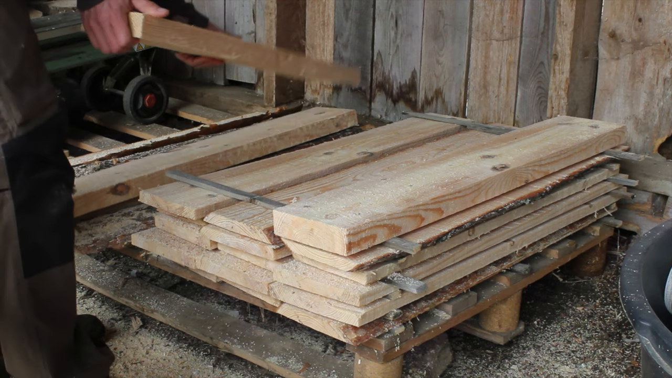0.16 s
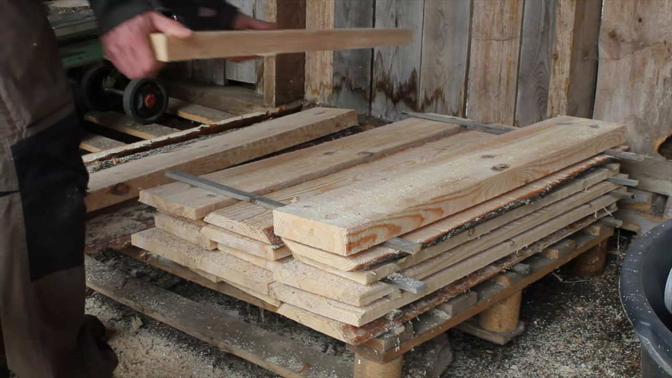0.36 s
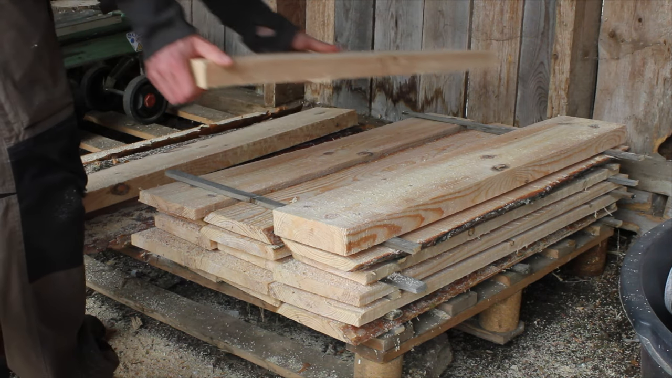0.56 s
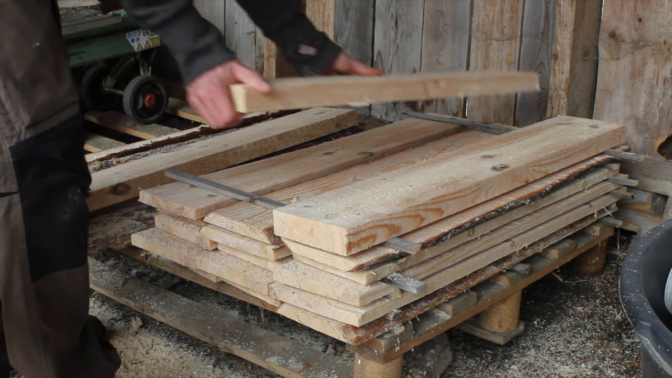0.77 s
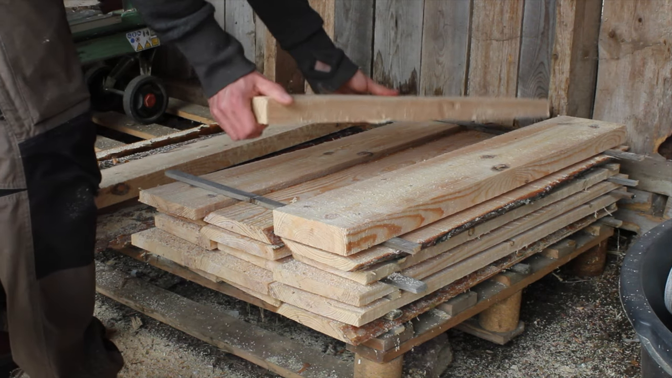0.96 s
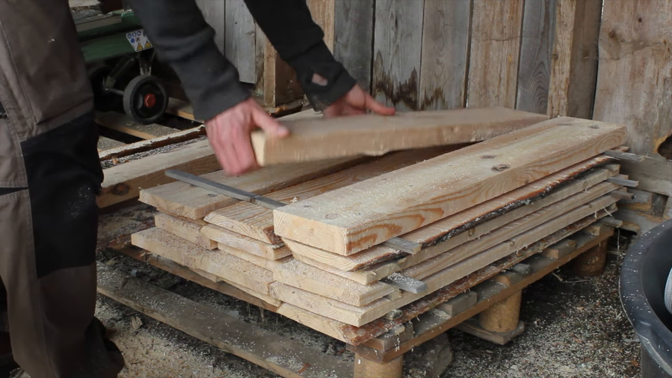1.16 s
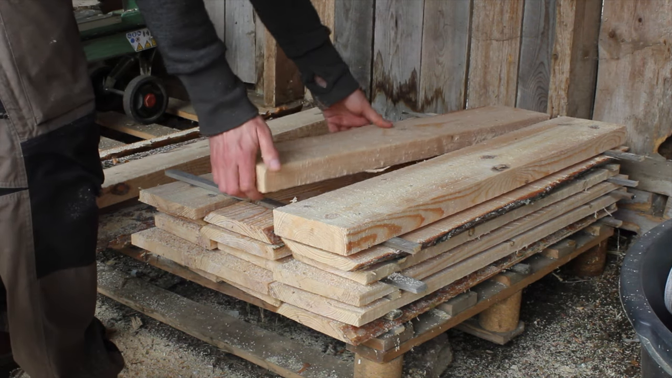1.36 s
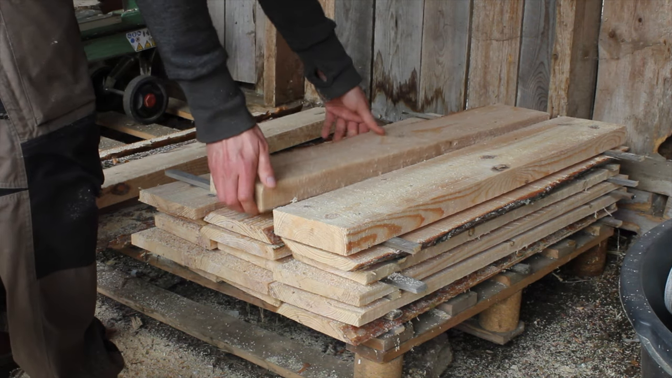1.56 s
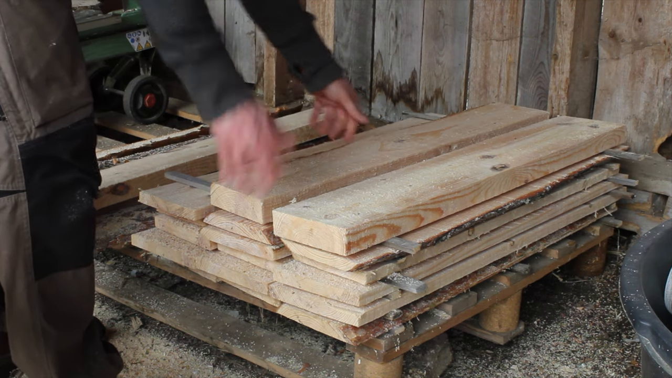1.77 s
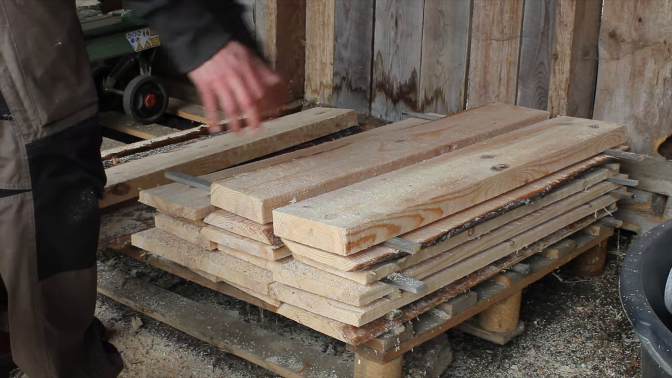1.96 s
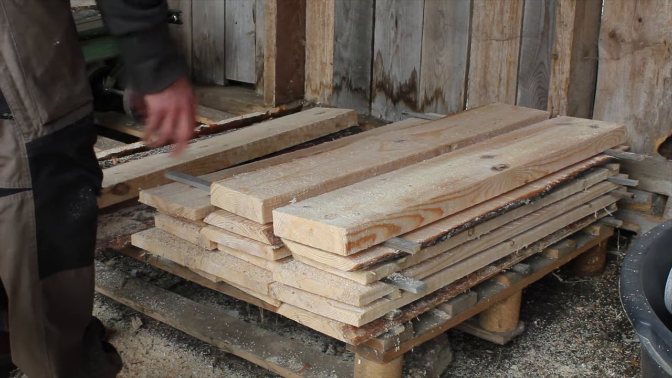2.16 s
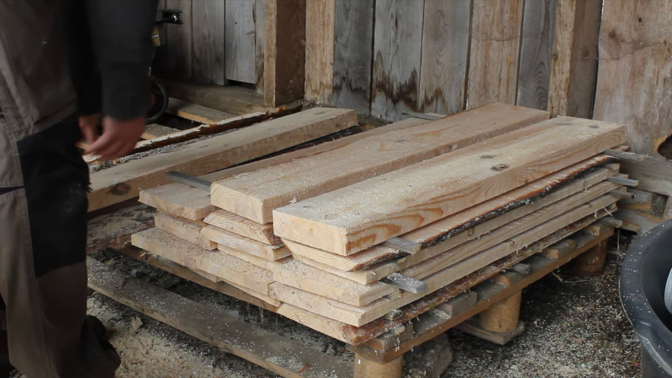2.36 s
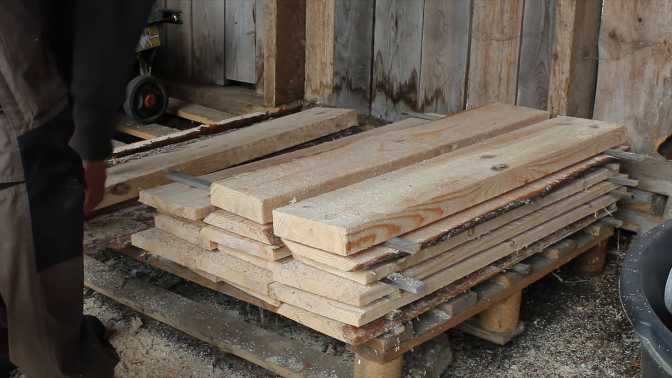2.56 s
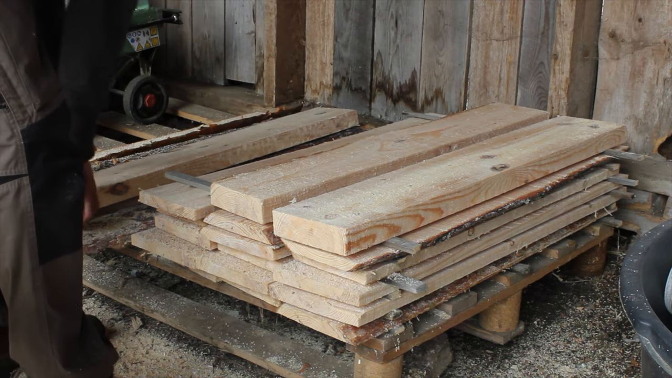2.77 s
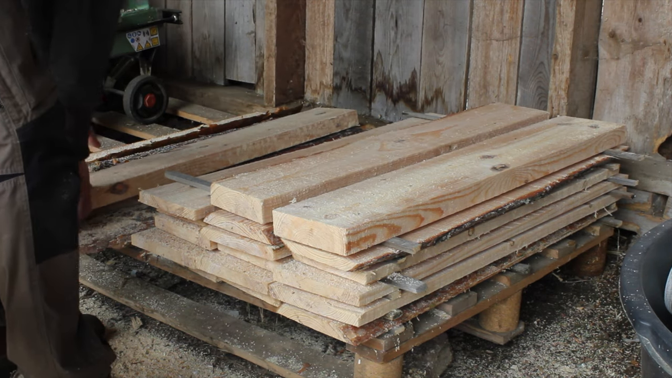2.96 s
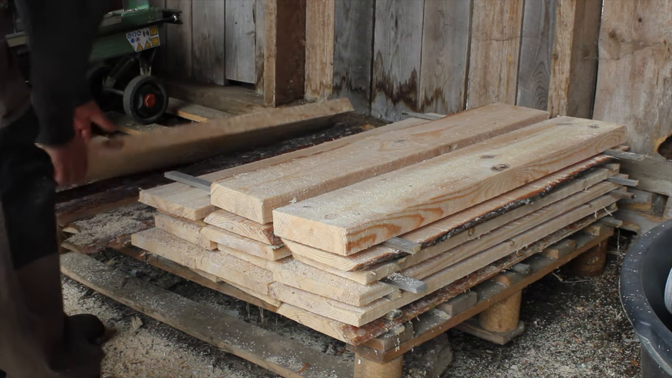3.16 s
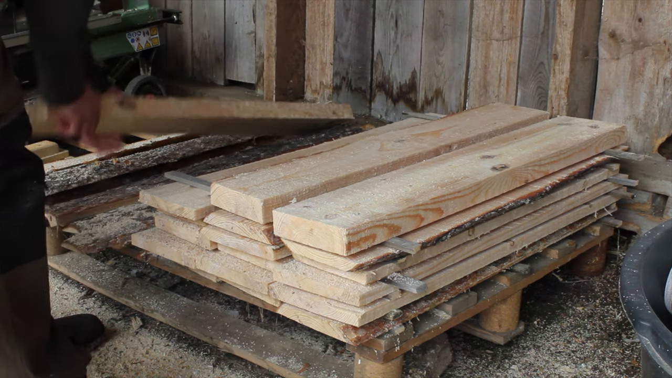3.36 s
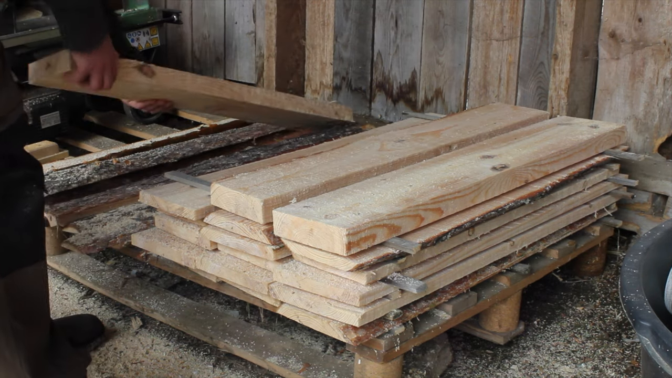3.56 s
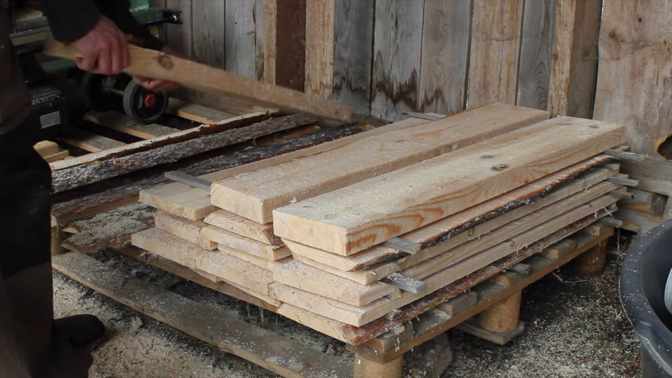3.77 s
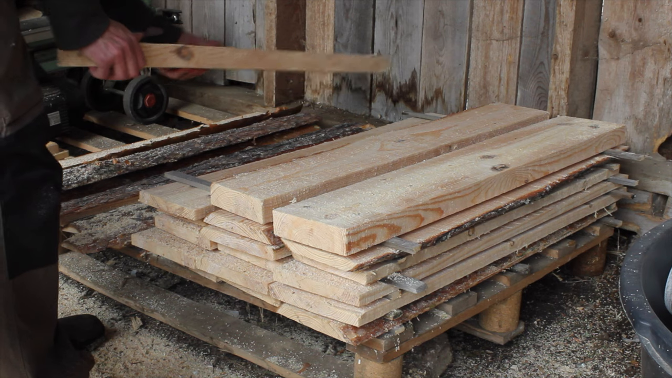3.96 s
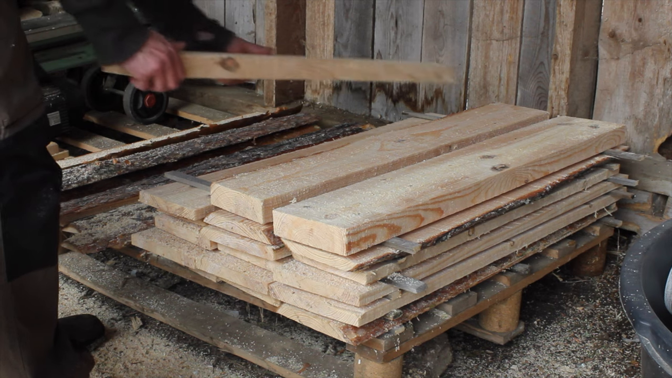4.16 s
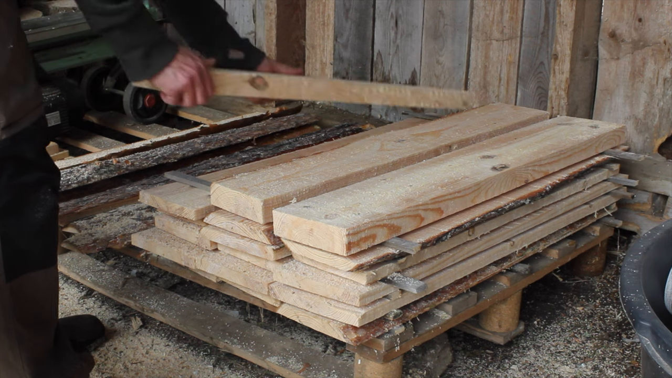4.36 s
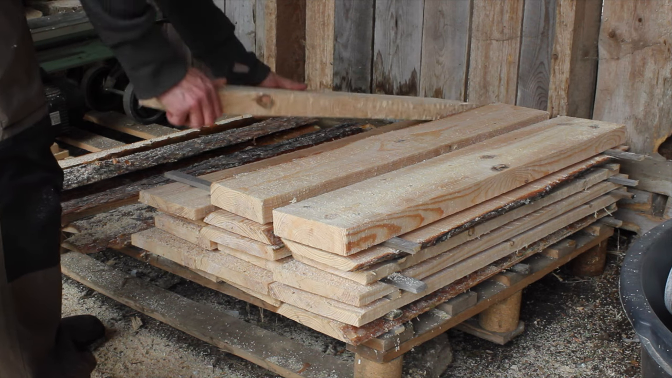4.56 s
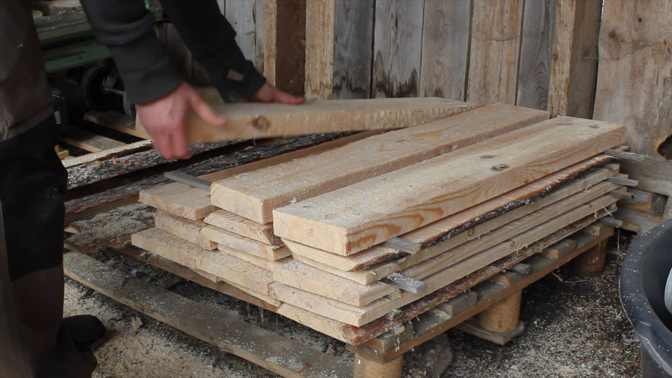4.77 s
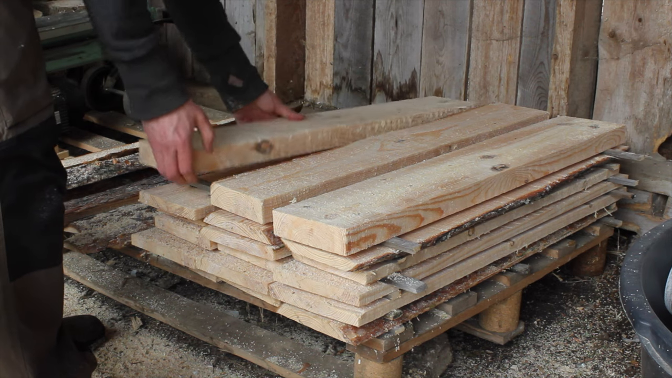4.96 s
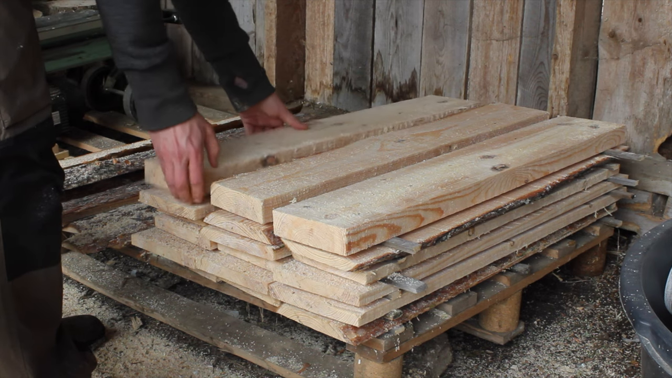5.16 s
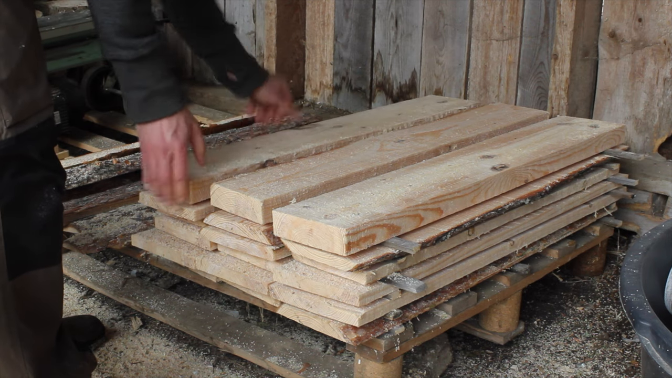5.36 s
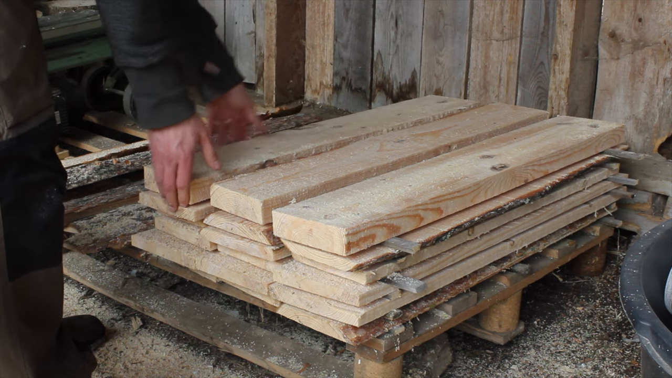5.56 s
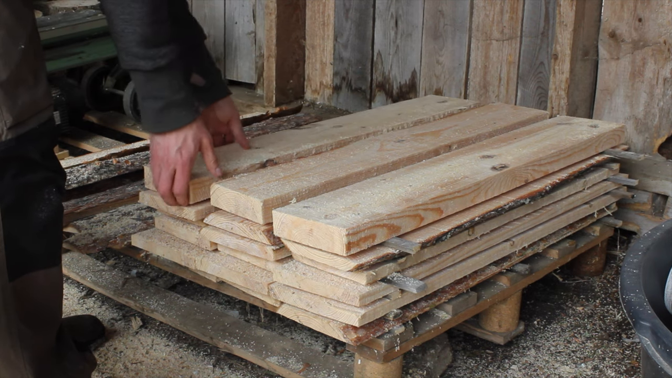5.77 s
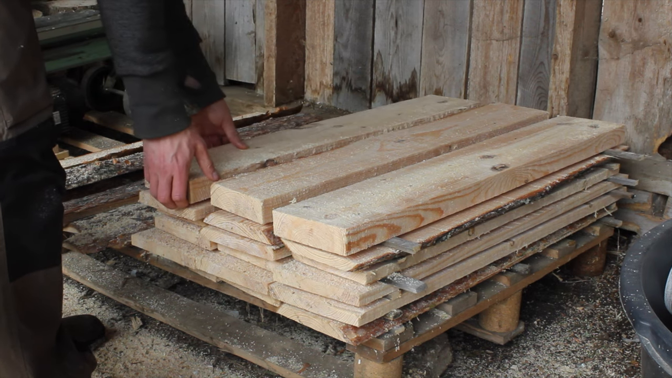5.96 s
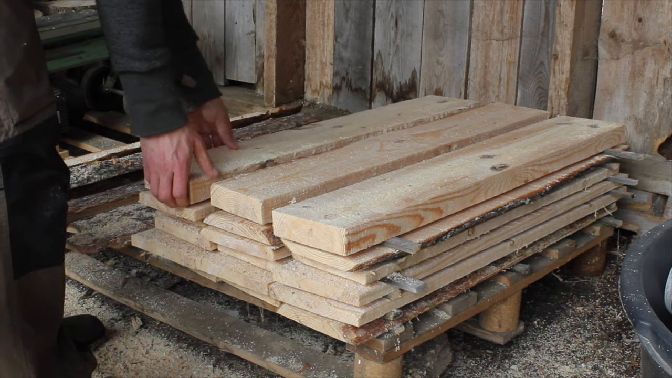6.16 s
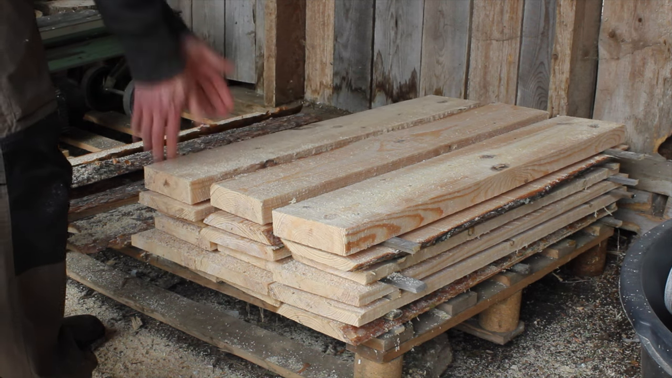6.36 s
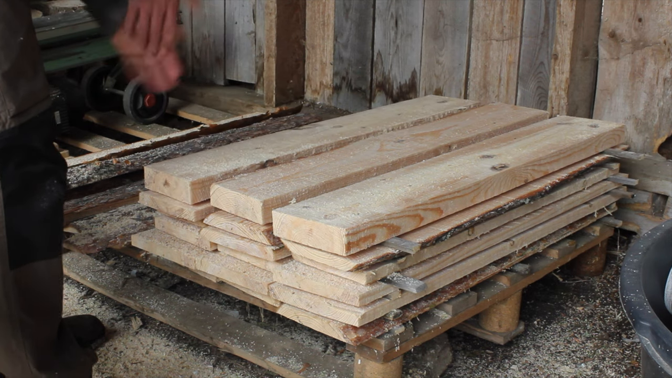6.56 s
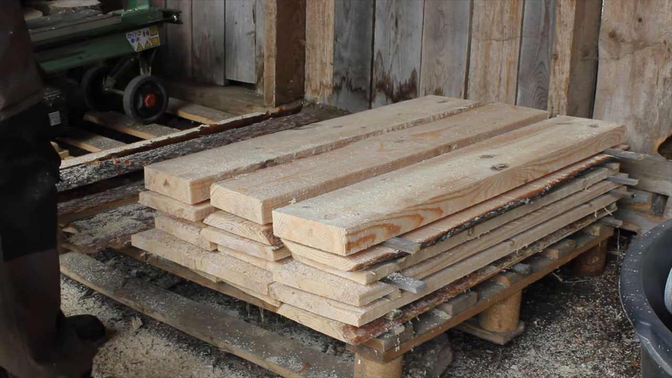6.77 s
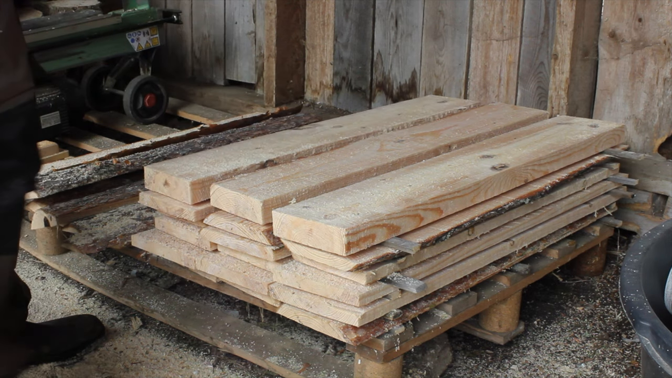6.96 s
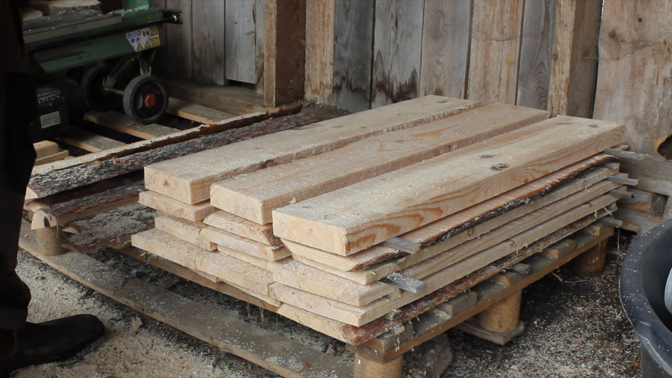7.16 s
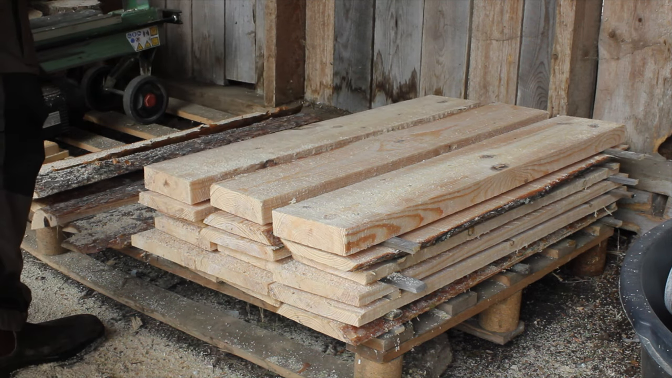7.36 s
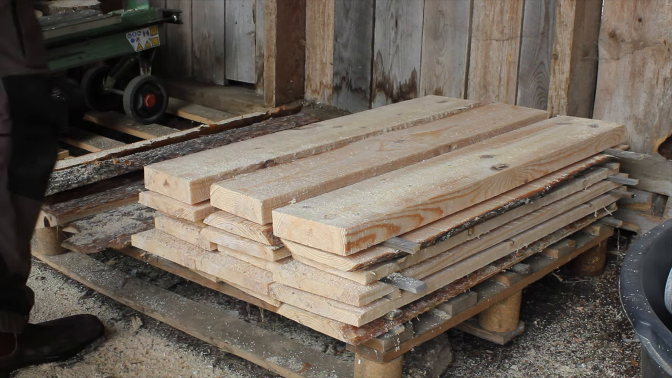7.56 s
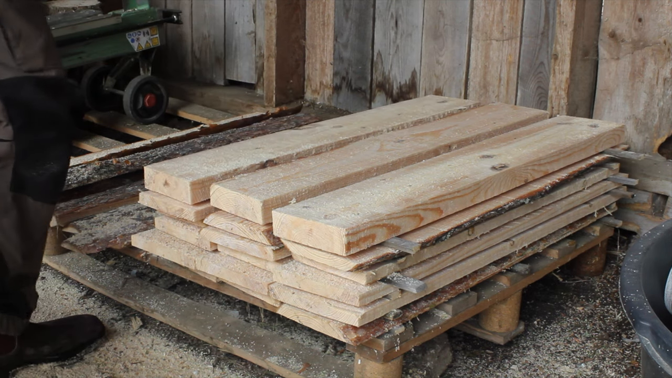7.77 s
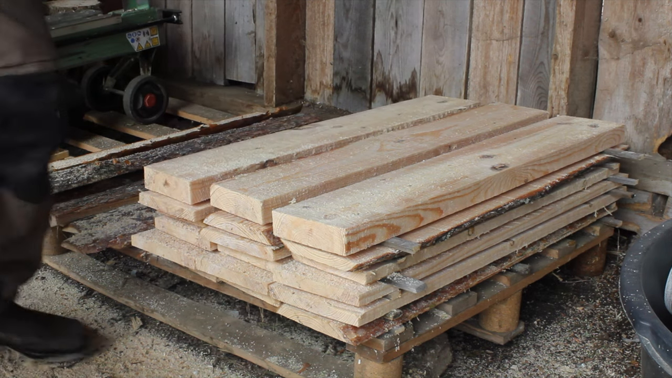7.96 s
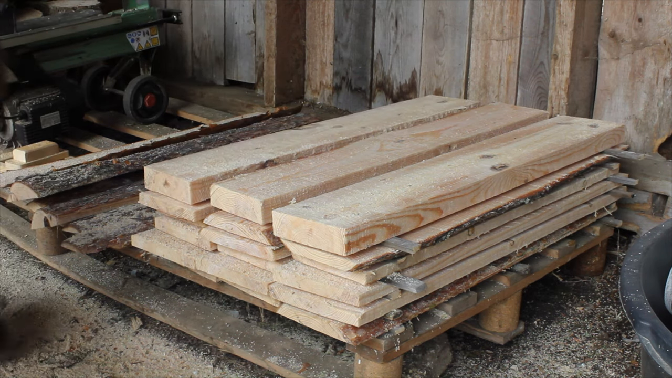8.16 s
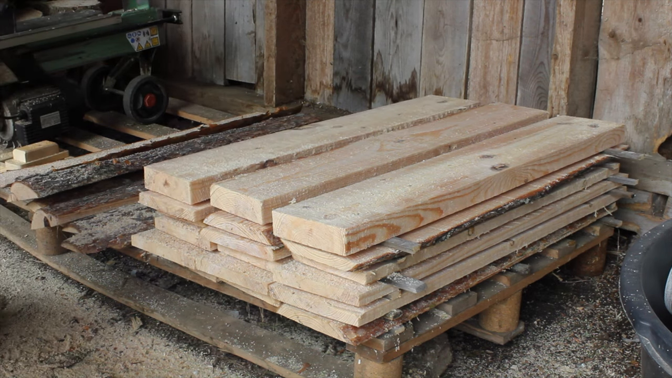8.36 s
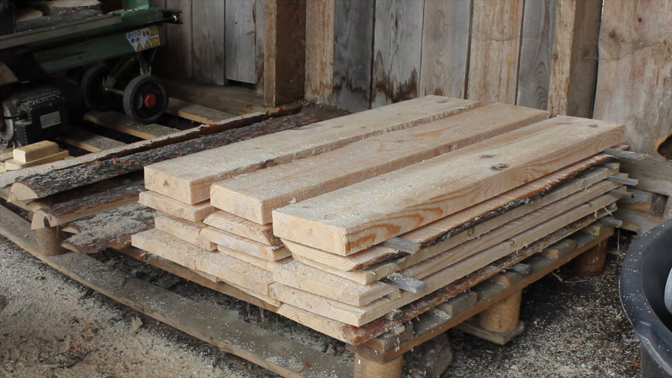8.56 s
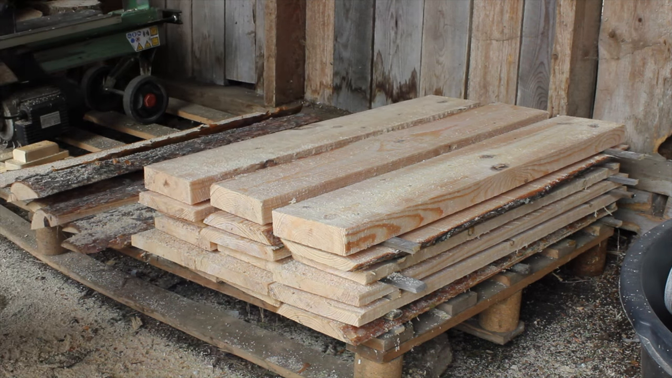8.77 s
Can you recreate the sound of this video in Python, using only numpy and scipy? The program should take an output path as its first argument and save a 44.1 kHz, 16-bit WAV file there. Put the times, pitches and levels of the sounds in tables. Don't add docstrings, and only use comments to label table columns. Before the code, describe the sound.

Near microphone, dry sound with a very short wooden-wall echo. Rough planks scrape, snap splinters and knock down onto a hollow pile twice, the second time harder. Small adjusting ticks follow, then hands are dusted off with a light sliding brush and two bright, crisp slaps, the loudest sounds. Soft steps and cloth rustle end it over low traffic hum and steady hiss.

```python
import sys
import numpy as np
from scipy import signal
from scipy.fft import rfft, irfft, next_fast_len
from scipy.io import wavfile
from scipy.ndimage import map_coordinates

SR = 44100
rng = np.random.default_rng(int(sys.argv[2]) if len(sys.argv) > 2 else 0)


def dump_mix(stems):
    frames = np.atleast_2d(stems).T
    limited = np.clip(frames, -1, 1)
    pcm = np.round(limited * 32767).astype(np.int16)
    wavfile.write(sys.argv[1], SR, pcm)


def makeup_ratio(level_db):
    decades = np.asarray(level_db, float) / 20
    return 10 ** decades


N = 388956

# [f/Hz, level/dB]
FAR_SPECTRUM = [(12, -35), (20, -9.5), (70, -8), (110, -12), (260, -4), (480, -2), (950, 1), (1150, -1.5),
                (1400, -10), (1900, -15), (4000, -15.5), (8000, -18.5), (12000, -21), (15600, -26.5)]
FAR_DB = -55.5
# [t/s, level/dB, rise/s, fall/s]
BACKGROUND_SWELLS = [(3.24, -56, 0.56, 1.5), (5.212, -54, 0.93, 0.33), (6.9, -54.5, 1.5, 0.45),
                     (7.69, -60.5, 1.2, 1.2), (8.81, -54, 0.64, .7)]

# [t/s, peak/dB, t60/s, f/Hz]
PUSHES = [(0.005, -45.5, 0.37, 190), (.045, -45, 0.2, 200), (.09, -47.5, 0.54, 101),
          (1.098, -49, 0.63, 100), (1.115, -46, .25, 200), (1.698, -40, 0.27, 232), (1.722, -40, 0.19, 290),
          (5.251, -56, 0.61, 80), (6.734, -29.5, 0.083, 420), (6.732, -39, 0.06, 139),
          (7.01, -35, 0.11, 334), (7.011, -45, 0.078, 130), (7.418, -46.5, 0.12, 125),
          (8.5, -53, 0.12, 129), (8.661, -51, 0.2, 250), (8.77, -52, .12, 199)]

# [t/s, peak/dB, thud/dB, crack/dB]
LIFT_CONTACTS = [
    (0.013, -48, 3.5, -1),
    (0.1, -42, -4, -3),
    (3.076, -42, -20, -11),
    (3.181, -47, -5, -7),
    (3.2, -37.5, -4.5, 1),
    (3.219, -37, -16, -12),
    (3.277, -41, -22, 1.5),
    (3.476, -54, -14, -13),
]
TOUCH_CONTACTS = [
    (1.039, -38, -8, -27),
    (1.051, -42, -4, -10),
    (1.089, -36.5, -9, -4),
    (1.111, -51, 5, -20),
    (1.134, -51, -12, -17.5),
    (1.173, -50, -16, -9),
]
FIRST_CONTACTS = [
    (1.653, -39, -10, -15),
    (1.663, -34, -12, -18),
    (1.698, -28, -11, -24),
    (1.71, -34, -12, -27),
    (1.721, -31, -5, -31),
    (1.746, -42, -3, -26),
    (1.771, -54, -6, -18),
]
TAP_CONTACTS = [
    (4.477, -33.5, -19, -9),
    (4.487, -38, -13, -24),
    (4.625, -45, -16, -15),
]
SECOND_CONTACTS = [
    (5.195, -25.5, -13, -16),
    (5.2, -19.5, -15.5, -34),
    (5.208, -25, -16, -27),
    (5.216, -31, -15, -33),
    (5.285, -42, -11, -9),
    (5.335, -42.5, -19, -2),
]
NUDGE_CONTACTS = [
    (5.637, -49, -19, -17),
    (5.759, -49, -20, -17),
    (5.89, -44.5, -19, -18),
    (6.336, -50, -27, -13),
]
# [f/Hz, width/Hz, level/dB]
LIFT_MODES = [(500, 310, -18), (806, 150, -2.5), (1080, 160, 1), (1500, 170, -2), (2000, 150, 4),
              (2320, 330, 0.5), (2690, 260, 0.5)]
TOUCH_MODES = [(467, 170, -7), (614, 76, -2), (734, 110, 0.5), (965, 89, -0.5), (1230, 250, -5),
               (1660, 250, -3), (2920, 2300, -8)]
FIRST_MODES = [(417, 52, -4), (520, 100, -4.5), (730, 74, -3), (992, 57, 3), (1160, 130, -1),
               (1520, 150, 2), (1740, 95, 2), (1960, 140, 1), (2400, 330, -3), (3050, 710, -11)]
TAP_MODES = [(694, 74, -4), (417, 240, -6.5), (1002, 60, -2), (1420, 130, -1), (1680, 96, -2),
             (1950, 96, -2), (2370, 200, -3), (2840, 460, -4), (4200, 1400, -8.5)]
SECOND_MODES = [(455, 65, -3), (563, 43, -3.5), (704, 26, 1.5), (830, 65, -2), (960, 130, -3),
                (1124, 80, -2), (1480, 290, -5), (2050, 130, -7), (2330, 170, -2), (2820, 190, -2.5),
                (3200, 780, -15.5)]
# [f/Hz, width/Hz, level/dB]
PILE_MODES = [(80, 45, -11.5), (138, 25, -1.5), (200, 40, 0.5), (233.4, 31, 1), (336, 79, -7)]
# [rattle t60/s, hardness/Hz]
LANDINGS = [
    (0.082, 2400),
    (0.091, 1600),
    (0.079, 2000),
    (0.1, 2500),
    (.08, 2500),
    (0.14, 3000),
]

# [t/s, peak/dB, centre/Hz, tail/dB]
SPLINTER_SNAPS = [(.018, -38, 7500, -17), (.0307, -24.5, 6000, -19), (.0347, -31, 9000, -18),
                  (.153, -39.5, 8000, -3), (0.308, -36, 9000, -18), (1.385, -45, 7000, -8),
                  (3.0245, -38, 3200, -6), (3.0762, -32, 4000, -9), (3.087, -37, 4000, -8),
                  (4.487, -43, 6000, -3), (6.27, -44, 9050, -7.5), (6.293, -44, 9000, -3),
                  (7.91, -33, 6000, -15), (4.375, -39, 13000, -8)]
# [t/s, peak/dB,
# centre/Hz, tail/dB, tail t60/s]
GRIT_SNAPS = [(.3088, -32, 4820, -6, 0.12), (.534, -47, 950, -16, .03), (3.7284, -41, 2600, -20, .03),
              (3.7285, -40, 3800, -20, .03), (5.287, -47, 2500, -2, .09), (5.338, -43, 4400, -6, .07),
              (8.365, -46, 9500, -6, .03), (5.89, -50, 2340, -6, 0.11), (4.625, -44.5, 2000, -2, .1),
              (3.415, -53, 2100, 0, .3), (6.745, -40, 1900, 2, .15), (5.336, -54, 1800, 0, .15),
              (5.201, -28, 2330, -4, .045), (1.706, -36, 1010, 2, .15)]
# [t/s, peak/dB, centre/Hz, tail/dB, width/centre]
HAND_SLAPS = [(6.4074, -19.5, 6000, -16, 3.5), (6.416, -33, 11000, -14, 1.2), (6.728, -30, 9000, -8, 1.6),
              (6.735, -16, 3500, -11, 4.3), (6.7365, -8, 6500, -16, 1.9), (6.737, -12, 1800, -22, 0.92),
              (6.743, -29, 1980, -16, 2.8), (6.7517, -19, 2800, -24, 2.5), (7.008, -31, 6000, -6, 2.5),
              (7.011, -26, 2200, -13, 2.3), (7.0161, -21, 3000, -1, 2.5)]
SPLINTER_WIDTH_RATIO, SPLINTER_T60_S, GRIT_WIDTH_RATIO, SLAP_T60_S = 1.23, 0.043, 0.28, 0.038

# [t/s, peak/dB, f/Hz, t60/s]
WOOD_RINGS = [(1.039, -37, 700, .03), (1.051, -38, 700, .035), (1.074, -43, 620, .05),
              (1.0895, -43, 3600, .006), (1.112, -44, 1000, .07), (1.091, -38, 1400, .02),
              (1.096, -38, 760, .03), (1.664, -32, 1500, .028), (1.657, -41, 480, .04),
              (1.698, -35, 2050, .014), (1.724, -34, 430, .09), (1.744, -40, 1080, .06),
              (1.728, -39, 2450, .02), (1.664, -39, 2150, .04), (1.647, -42, 520, .07),
              (1.698, -38, 1740, .04), (1.699, -40, 133, .2), (1.757, -43, 120, .13),
              (1.702, -35, 1046, .04), (1.715, -31, 990, .075), (1.712, -35, 215, .17),
              (1.722, -36, 1550, .03), (1.721, -41, 2050, .02), (1.747, -37, 340, 0.09),
              (1.776, -41, 250, .07), (3.202, -37, 2400, .012), (3.207, -38, 1500, .015),
              (3.214, -37, 2000, .012), (3.231, -38, 1500, .015), (3.196, -45, 200, .1),
              (3.244, -39, 1300, .015), (3.462, -51, 2950, .07), (3.481, -47, 2000, .03),
              (3.7285, -42, 2200, .004), (4.477, -44, 1480, .09), (4.478, -45, 242, .15),
              (4.4895, -35, 1010, .11), (4.496, -44, 549, 0.11), (.534, -48, 950, .02),
              (5.218, -30, 520, .04), (5.226, -33, 711, .15), (5.226, -36, 1950, .04),
              (5.219, -29, 980, .03), (5.231, -31, 850, .04), (5.244, -36, 1150, .07),
              (5.267, -39, 740, .06), (5.302, -42, 1000, .04), (5.313, -46, 900, .03),
              (5.197, -40, 140, .06)]
# [t/s, peak/dB, f/Hz, t60/s]
PALM_POPS = [(6.4057, -37, 3000, .002), (6.4072, -23, 11000, .002), (6.4165, -34, 12500, .004),
             (6.518, -42, 2100, .06), (6.545, -42, 4700, .025), (6.576, -42, 5200, .015),
             (6.7295, -33, 11000, .003), (6.7315, -30, 1600, .012), (6.733, -31, 6000, .004),
             (6.7367, -14, 9500, .003), (6.7368, -21, 13500, .002), (6.742, -22, 12500, .002),
             (6.7517, -27, 10500, .003), (6.735, -27, 4000, .012), (6.7415, -27, 650, .012),
             (6.744, -31, 4700, .03), (6.744, -28, 1750, .01), (6.761, -29, 2000, .02),
             (6.7735, -28, 2000, .01), (6.778, -31, 1850, 0.045), (7.0082, -25, 12000, .002),
             (7.0107, -26, 12500, .002), (7.0135, -26, 11000, .002), (7.0162, -17, 13000, .002),
             (7.016, -8, 6200, .0016), (7.0165, -29, 5100, .008), (7.0186, -22, 5500, .006),
             (7.0212, -24, 9000, .002), (7.0232, -28, 4400, .01), (7.0105, -31, 900, 0.015),
             (7.018, -32, 750, 0.022), (7.027, -30, 2300, .012), (7.029, -31, 3200, .02),
             (7.034, -30, 2700, .012), (7.012, -31, 1900, .012), (7.031, -27, 6000, .008),
             (7.037, -33, 1900, .015)]
# [t/s, peak/dB, f/Hz, t60/s]
BARK_CHIPS = [(.018, -40, 6500, .003), (.0385, -39, 6000, .004), (.0405, -39, 8500, .003),
              (.044, -41, 5300, .008), (.053, -42, 9500, .003), (.102, -42, 9000, .004),
              (3.025, -43, 2500, .015), (3.0255, -45, 4900, .01), (3.0765, -39, 7200, .005),
              (3.077, -42, 1900, .02), (3.0875, -43, 2600, .01), (3.1295, -44, 9000, .003),
              (3.1325, -43, 4000, .003), (3.141, -44, 11000, .002), (3.142, -45, 1700, .01),
              (3.277, -45, 2700, .015), (5.286, -44, 2850, .02), (5.2015, -29, 2350, .03),
              (5.295, -47, 2400, .05), (5.336, -52, 1900, .15), (1.0395, -39, 1700, .005),
              (4.4905, -39, 2500, .006), (4.478, -42, 2950, .012), (4.53, -45, 1040, .08),
              (4.532, -44, 235, .14), (4.556, -46, 980, .04), (5.2005, -30, 2800, .02),
              (6.337, -48, 1550, .05), (6.407, -36, 1650, .012)]
MODE_CLUSTER = [(1, .95), (1.083, .13), (.895, .12)]
RING_RISE_RATIO = 0.015

# [t/s, level/dB, brightness/dB]
QUICK_BRUSHES = [(.035, -60, 3), (.31, -59, 3), (1.092, -55, -5), (1.38, -64, 2), (3.03, -58, -4),
                 (3.08, -55, -5), (4.37, -66, 9), (4.48, -63, 1), (5.2, -57, 3), (5.35, -63.5, -8),
                 (5.64, -66, -5), (5.89, -62, -3), (6.27, -60.5, 3), (7.374, -65, 8), (7.77, -66, 8),
                 (8.05, -59, 6), (8.17, -61, 6), (8.244, -57, 6), (4.89, -63, 7), (3.7, -62, 7),
                 (3.51, -66, 6), (3.13, -63, 6), (8.506, -57.5, -5.5), (8.645, -53, 0.5)]
BRUSH_RISE_S, BRUSH_FALL_S = 0.028, 0.084
# [peak t/s, level/dB, rise/s, fall/s, brightness/dB]
SLOW_MOVES = [(.06, -55.5, 0.28, 0.45, -2), (.27, -63, .5, .08, 1), (.91, -65.5, 1.1, .1, 3),
              (1.07, -65, 0.24, .05, 7), (1.235, -60, 0.2, 0.15, -1), (1.7, -54.5, 0.12, 0.075, -1),
              (2, -71, 1.8, 2, 2), (2.6, -58.5, 0.55, 0.26, 0), (2.9, -58.5, 0.39, 0.29, 2),
              (3.22, -44.5, 0.094, .11, -2.5), (3.13, -61, .1, .3, -2), (3.475, -59, 0.25, 0.13, -6),
              (3.43, -62, .1, .2, -7), (3.69, -56, 0.32, 0.32, 1.5), (4.64, -58, .09, 0.1, -1),
              (4.97, -61.5, .25, .1, -1), (5.19, -60, 0.1, .03, 2), (8.67, -55.5, .1, .13, -2),
              (6.37, -62.5, 0.22, .1, -6.5), (6.505, -53.5, .04, .12, 9), (6.565, -51, .07, 0.074, 9),
              (7.13, -63.5, .01, .9, 2), (7.66, -57.5, 0.94, 0.92, -1.5), (7.9, -53, 0.17, 0.13, 3.5),
              (8.15, -66, 1.4, .2, 1), (8.56, -62, .12, .4, -4), (8.81, -59.5, 0.84, .5, -2.5)]
# [f/Hz, level/dB]
SLEEVE_FIZZ = [(1760, -6.5), (3000, -1), (5500, -0.5), (8500, -4.5), (11500, -15)]
BARK_SCRAPE = [(600, -12), (1200, 1), (2000, 2), (3500, -5.5), (6000, -14.5)]
DUST_WHISPER = [(7500, -26), (10000, 1.5), (12600, 3.5), (14000, -11), (15700, -13)]
DUST_UNDER_DB = -5

# [t/s, level/dB, rise/s, fall/s, hold/s]
BIRD_PHRASES = [
    (2.8, -62, .15, .5, .15),
    (3.1, -66, .4, .4, .4),
    (3.65, -64, .5, .6, 0.16),
]

# [meet t/s, meet/dB, slide t/s, slide/dB, slide hold/s]
PALM_STROKES = [
    (6.407, -48, 6.503, -40.5, 0.075),
    (6.738, -32.5, 6.782, -39, 0.034),
    (7.016, -37, 7.07, -39.5, 0.019),
]
MEET_RISE_S, MEET_FALL_S, SLIDE_RISE_S, SLIDE_FALL_S = 0.016, 0.038, 0.1, 0.04
FINGERS_LEAD_S = (0.00085, 0.0098, .0082)
# [t/s, level/dB, rise/s, fall/s]
AIR_BURSTS = [
    (6.53, -50.5, 0.28, 0.09),
    (6.739, -31.5, .01, 0.057),
    (7.022, -32, 0.036, .055),
]
# [f/Hz, width/Hz, level/dB]
AIR_MODES = [
    [(1500, 640, 1), (2150, 390, 7), (3300, 1500, -2), (5800, 2500, -2)],
    [(520, 290, -4.5), (1120, 270, -5), (1790, 230, -1), (2330, 270, -5), (3040, 930, -8)],
    [(450, 360, -18), (1200, 430, -3), (2200, 820, 0.5), (3200, 1340, -4), (5900, 1700, -6.5)],
]
# [f/Hz, level/dB]
SKIN_HISS = [(1470, -30), (2500, -2.5), (4000, -2), (4800, -1), (6850, -3.5), (11200, -0.5), (13600, -5.5),
             (15700, -9.5)]

# [f/Hz, t60/s]
SHED_DECAY = [(150, 0.11), (1000, 0.22), (4000, 0.22), (12000, 0.059)]


def unit(x):
    return x / np.sqrt(np.mean(x ** 2) + 1e-20)


def top(x):
    return x / np.max(np.abs(x))


def fade(t, t60_s):
    return makeup_ratio(-60 * t / t60_s)


def add_at(out, t_s, x):
    out[round(t_s * SR):][:len(x)] += x


def along(points, hz):
    f, v = np.transpose(points)
    return np.interp(np.log(hz + 1), np.log(f + 1), v)


def wobble(rate_hz):
    knots = rng.standard_normal(int(N * rate_hz / SR) + 4)
    return map_coordinates(knots, [np.arange(N) * rate_hz / SR])


def swell(t_s, db, rise_s, fall_s, hold_s=0):
    t = np.arange(N) / SR - t_s
    slope = np.maximum(-t / rise_s, (t - hold_s) / fall_s)
    return makeup_ratio(db - 20 * np.maximum(0, slope))


def filtered(x, response):
    m = next_fast_len(len(x) + 8192)
    return irfft(rfft(x, m) * response(np.fft.rfftfreq(m, 1 / SR)), m)[:len(x)]


def resonant(x, modes):
    def response(f):
        total = 0
        for k, (centre, width, db) in enumerate(modes):
            damping = 1j * f * width
            total = total + (-1) ** k * makeup_ratio(db) * damping / (centre ** 2 - f ** 2 + damping)
        return total
    return filtered(x, response)


def resonant_twice(x, centre_hz, width_hz):
    band = [(centre_hz, width_hz, 0)]
    return resonant(resonant(x, band), band)


def soft(x, hz):
    return filtered(x, lambda f: 1 / (1 + 1j * f / hz) ** 2)


def grainy(grain_db, rate_hz):
    return unit(rng.standard_normal(N) * makeup_ratio(grain_db * wobble(rate_hz)))


def coloured(x, spectrum):
    return unit(filtered(x, lambda hz: makeup_ratio(along(spectrum, hz))))


def far():
    power = makeup_ratio(FAR_DB) ** 2 + sum(swell(*row) ** 2 for row in BACKGROUND_SWELLS)
    drift = makeup_ratio(0.62 + 0.18 * wobble(5.5))
    return np.sqrt(power) * drift * coloured(rng.standard_normal(N), FAR_SPECTRUM)


def steps():
    out, t = np.zeros(N + SR), np.arange(SR // 2) / SR
    for t_s, db, t60_s, hz in PUSHES:
        push = rng.standard_normal(len(t)) * fade(t, t60_s)
        add_at(out, t_s, makeup_ratio(db) * top(resonant_twice(push, hz, 0.74 * hz)))
    return out[:N]


def board(contacts, modes, rattle_t60_s, hard_hz):
    out, t = np.zeros(N + SR), np.arange(SR // 3) / SR
    long_fade = fade(t, 2.8 * rattle_t60_s)
    for t_s, db, thud_db, crack_db in contacts:
        rough = rng.standard_normal((4, len(t))) * (1 + 1.5 * fade(t, 0.0041))
        settling = soft(rough[3] * long_fade, 810)
        rattle = rough[0] * fade(t, rattle_t60_s) + makeup_ratio(-0.5) * settling
        knock = soft(resonant(rattle, modes), hard_hz)
        thud = resonant(resonant(rough[1] * long_fade, PILE_MODES), [(184, 550, 0)])
        crack = resonant(rough[2] * fade(t, 0.6 * rattle_t60_s), [(5500, 7400, 0)])
        contact = top(knock) + makeup_ratio(thud_db) * top(thud) + makeup_ratio(crack_db + 2) * top(crack)
        add_at(out, t_s, makeup_ratio(db + 1) * contact)
    return out[:N]


def snaps():
    rows = [(*row, SPLINTER_WIDTH_RATIO, SPLINTER_T60_S) for row in SPLINTER_SNAPS]
    rows += [(*row[:4], GRIT_WIDTH_RATIO, row[4]) for row in GRIT_SNAPS]
    rows += [(*row, SLAP_T60_S) for row in HAND_SLAPS]
    out, t = np.zeros(N + SR), np.arange(SR // 5) / SR
    for t_s, db, hz, tail_db, width_ratio, t60_s in rows:
        noise = rng.standard_normal((2, len(t)))
        blow = (t == 0) + 0.23 * noise[0] * fade(t, 0.0026)
        spike = top(resonant_twice(blow, hz, width_ratio * hz))
        spray = top(resonant_twice(noise[1] * fade(t, t60_s), hz, width_ratio * hz))
        add_at(out, t_s, makeup_ratio(db) * (spike + makeup_ratio(tail_db) * spray))
    return out[:N]


def rings():
    out, t = np.zeros(N + SR), np.arange(SR // 3) / SR
    for t_s, db, hz, t60_s in WOOD_RINGS + PALM_POPS + BARK_CHIPS:
        envelope = makeup_ratio(db) * fade(t, t60_s) * (1 - np.exp(-t / (RING_RISE_RATIO * t60_s)))
        tone = sum(share * np.sin(2 * np.pi * hz * ratio * t) for ratio, share in MODE_CLUSTER)
        add_at(out, t_s, envelope * tone)
    return out[:N]


def rustle():
    brushes = [(t_s, db, BRUSH_RISE_S, BRUSH_FALL_S, bright) for t_s, db, bright in QUICK_BRUSHES]
    moves = SLOW_MOVES + brushes
    power = np.array([swell(*move[:4]) ** 2 for move in moves])
    bright_db = np.array([move[4] for move in moves])
    share_db = [0 * bright_db, -bright_db, bright_db + DUST_UNDER_DB]
    fizz, scrape, dust = np.sqrt(makeup_ratio(share_db) ** 2 @ power)
    burst, fibres = makeup_ratio(1.34 * wobble(35)), grainy(1.4, 700)
    sleeves = makeup_ratio(0.75) * fizz * coloured(fibres, SLEEVE_FIZZ)
    whisper = makeup_ratio(-3.5) * dust * coloured(fibres, DUST_WHISPER)
    bark = makeup_ratio(-0.2) * scrape * coloured(grainy(1.8, 300), BARK_SCRAPE)
    return burst * (sleeves + whisper + bark)


def bird():
    level = np.sqrt(sum(swell(*phrase) ** 2 for phrase in BIRD_PHRASES))
    flutter = makeup_ratio(2.6 * wobble(30))
    return level * flutter * unit(resonant_twice(rng.standard_normal(N), 4150, 620))


def palms():
    skin = coloured(grainy(3, 900), SKIN_HISS) * makeup_ratio(1.2 * wobble(60))
    sliding_skin = coloured(skin, [(2000, -2.5), (14000, 2.5)])
    out = np.zeros(N)
    for stroke, lead_s, burst, modes in zip(PALM_STROKES, FINGERS_LEAD_S, AIR_BURSTS, AIR_MODES):
        meet_s, meet_db, slide_s, slide_db, hold_s = stroke
        touching = np.arange(N) > (meet_s - lead_s) * SR
        meet = swell(meet_s, meet_db, MEET_RISE_S, MEET_FALL_S) * skin
        slide = swell(slide_s, slide_db, SLIDE_RISE_S, SLIDE_FALL_S, hold_s) * sliding_skin
        cupped = swell(*burst) * unit(resonant(grainy(3.2, 300), modes))
        out += touching * (meet + slide + cupped)
    return out


def shed(x):
    hz, t, z = signal.stft(rng.standard_normal(SR // 2), SR, nperseg=256)
    decay = fade(t, along(SHED_DECAY, hz)[:, None])
    tail = signal.istft(z * decay, SR, nperseg=256)[1]
    return signal.fftconvolve(np.pad(x, (400, 0)), tail / np.linalg.norm(tail))[:N]


def scene():
    handlings = [(LIFT_CONTACTS, LIFT_MODES), (TOUCH_CONTACTS, TOUCH_MODES), (FIRST_CONTACTS, FIRST_MODES),
                 (TAP_CONTACTS, TAP_MODES), (SECOND_CONTACTS, SECOND_MODES), (NUDGE_CONTACTS, TAP_MODES)]
    boards = sum(board(*handling, *landing) for handling, landing in zip(handlings, LANDINGS))
    near = boards + steps() + snaps() + rings() + palms()
    return (near + makeup_ratio(-13) * shed(near) + rustle() + bird() + far())[None]


def roll_off(x):
    return signal.sosfilt(signal.butter(12, 15830, fs=SR, output="sos"), x)


def record(dry):
    def band(hz):
        return (hz < 15830) * 1j * hz / (45 + 1j * hz)
    mix = filtered(dry[0], band)[None]
    return roll_off(mix)


dry = scene()
out = record(dry)
dump_mix(out)
```